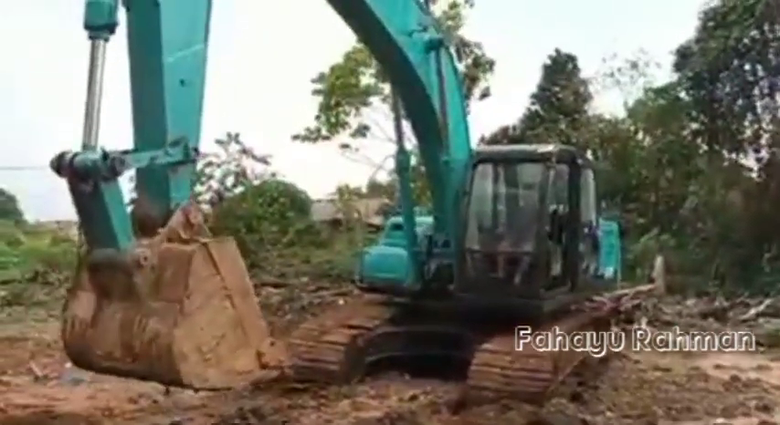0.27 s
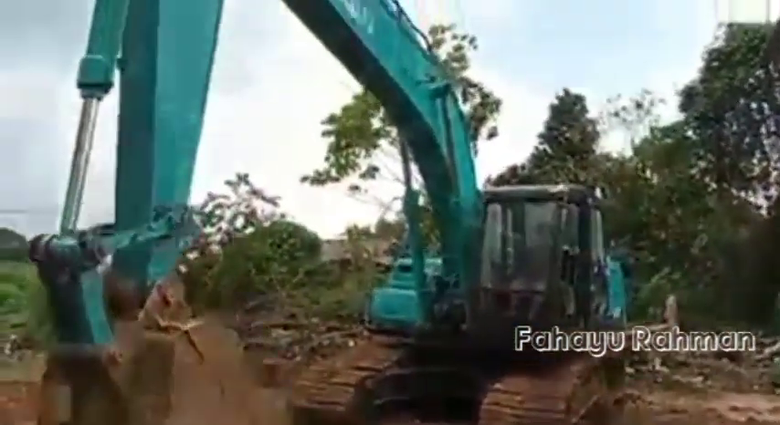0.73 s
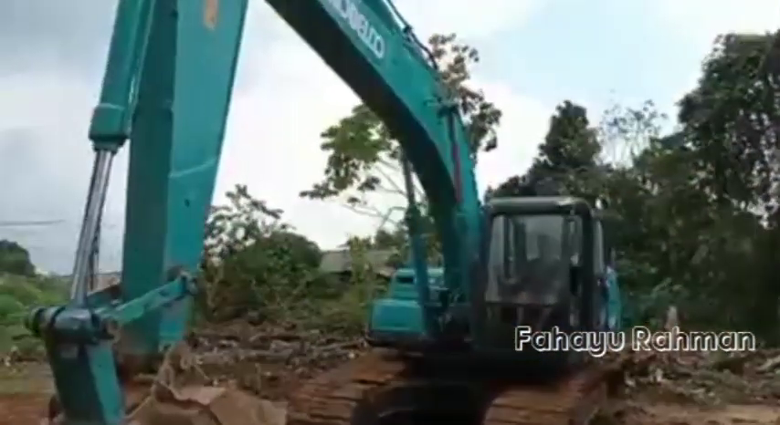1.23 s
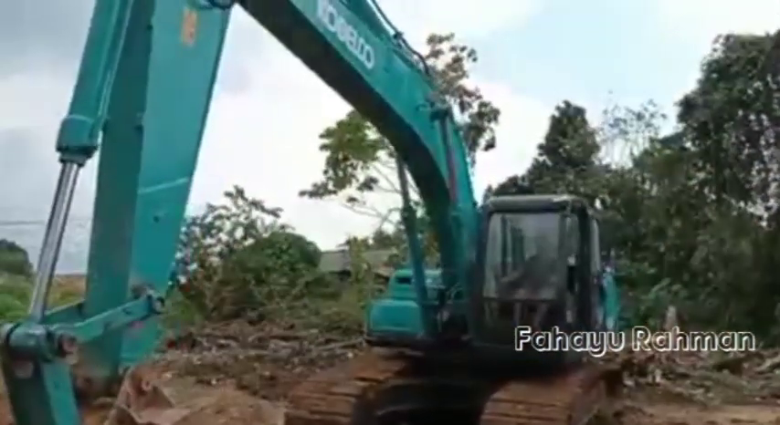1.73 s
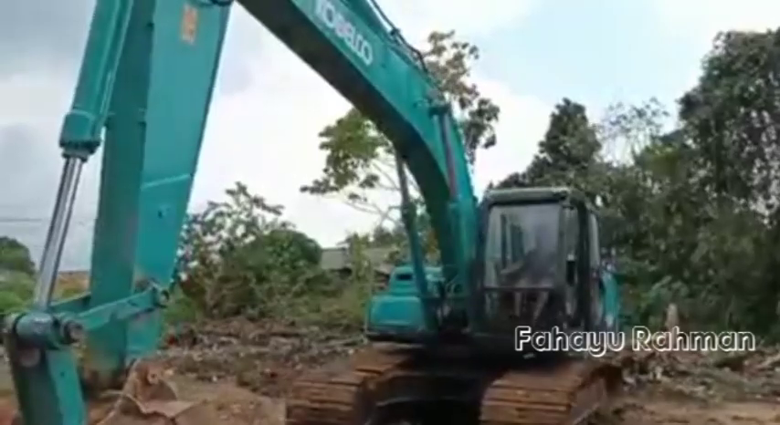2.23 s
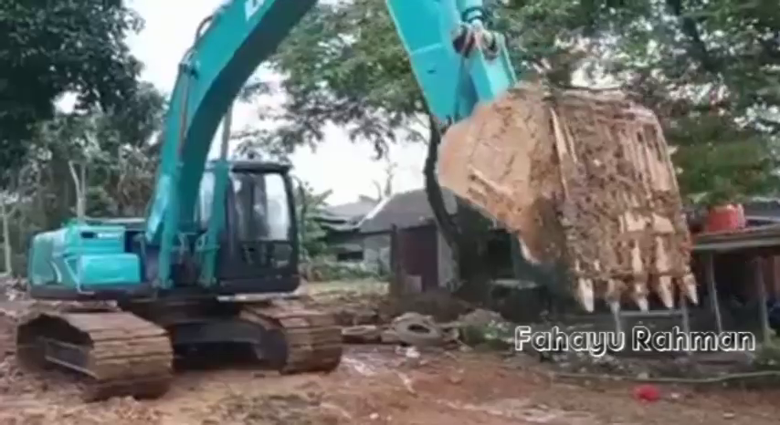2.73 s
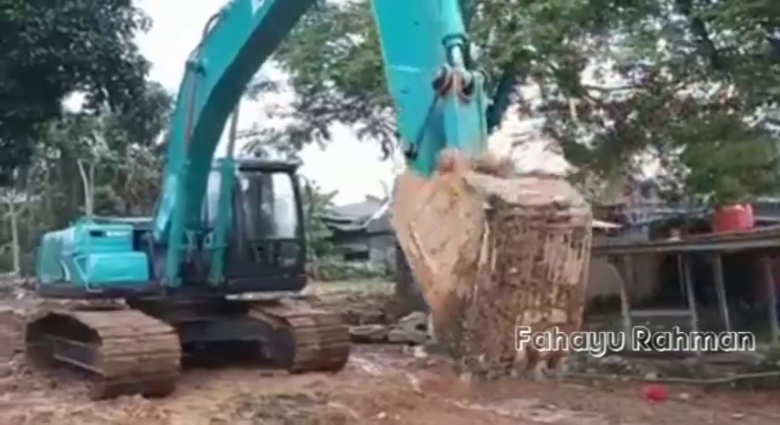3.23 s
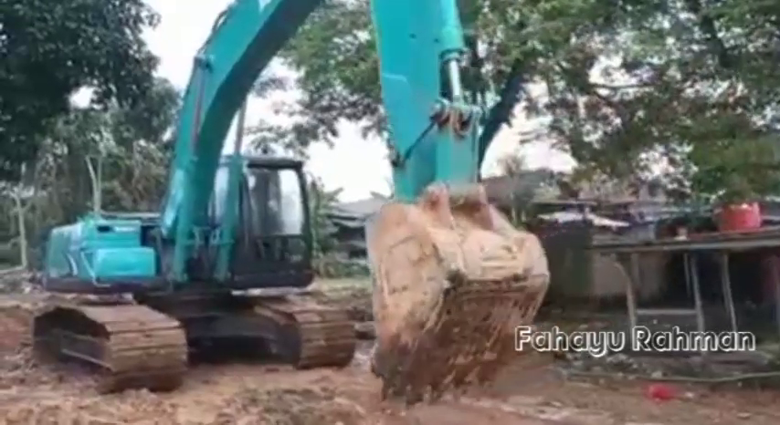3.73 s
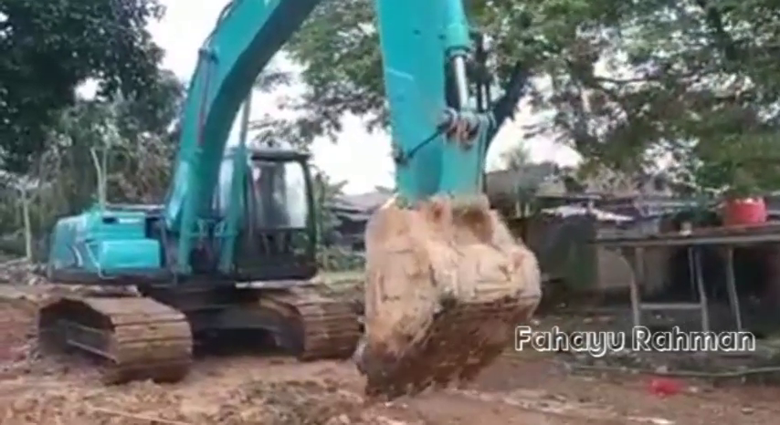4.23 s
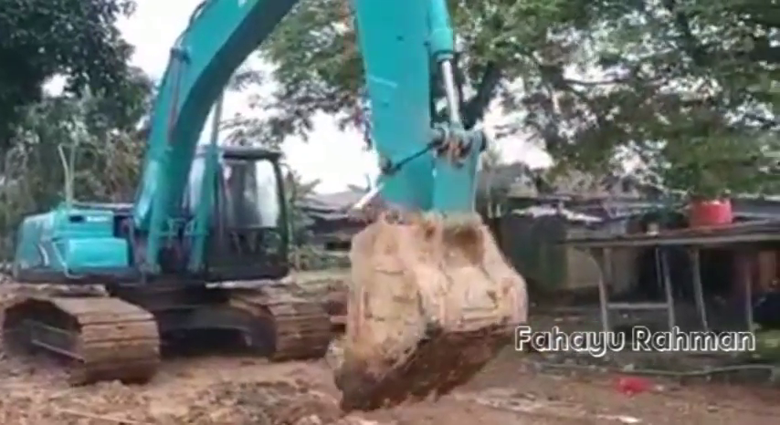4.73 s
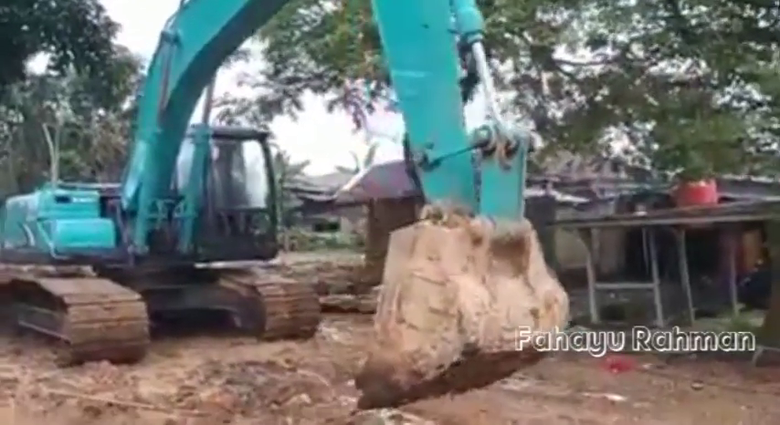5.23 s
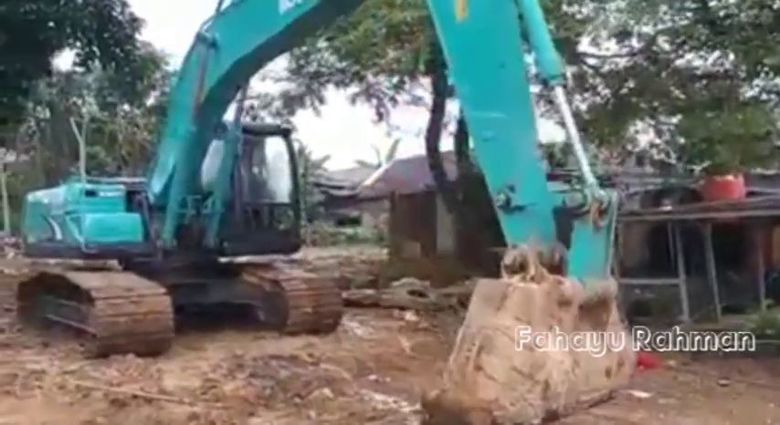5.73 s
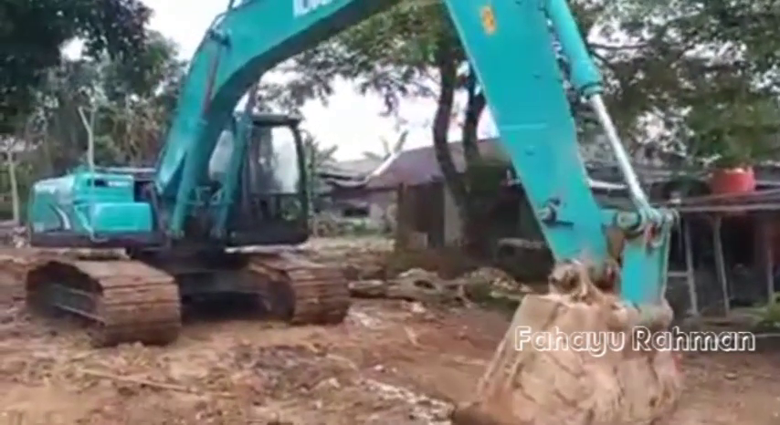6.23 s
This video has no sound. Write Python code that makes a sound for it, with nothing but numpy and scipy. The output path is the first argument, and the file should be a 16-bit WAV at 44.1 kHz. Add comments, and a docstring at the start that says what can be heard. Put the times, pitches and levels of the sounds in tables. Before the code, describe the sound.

Outdoors, a tracked excavator's diesel engine roars low and steady with a faint pump whine. Heavy steel clanks, bright pin ticks and hollow arm thuds tumble closely for under two seconds, then only engine. The sound cuts to about half a second of silence and fades back in from another position, with sparser knocks, a thin oil hiss and a last cluster of clanks. Stereo microphones fairly near, dry open air.

```python
"""Outdoors: a diesel excavator digs, heard from two positions with a silent cut and a fade-in between them.
Engine roar, exhaust orders, pump whine and fan air come from shaped noise and shaft-locked cosines.
Clanks of pins and bucket teeth are rattling noise forces ringing steel modes; the hollow boom arm
answers with low resonances, pins tick brightly. In the second position a valve hisses in a moving noise band."""
import sys
import numpy as np
from scipy import signal
from scipy.fft import rfft, irfft
from scipy.io import wavfile
from scipy.ndimage import uniform_filter1d

SR = 44100
rng = np.random.default_rng(int(sys.argv[2]) if len(sys.argv) > 2 else 0)


def output_pcm(signal):
    """Save a mono or channel-first signal as 16-bit PCM at the path in sys.argv[1].

    Samples are clipped to [-1, 1] before scaling.
    """
    pcm = np.clip(np.atleast_2d(signal).T, -1, 1) * 32767
    wavfile.write(sys.argv[1], SR, np.round(pcm).astype(np.int16))


N = 285768
T_S = np.arange(N) / SR
CUT_S, RETURN_S, FULL_S = 2.356, 2.812, 3.07  # silent from, fade-in from, fade-in to
FIRST = T_S < CUT_S  # first position

# engine roar spectrum, by position: f/Hz, relative level/dB
ROAR = [
    [(18, -59), (30, -30), (49, -10), (187, 2), (284, -15), (324, -10), (359, -2.5), (518, -20),
     (561, -7.5), (852, -15.5), (921, -18), (2420, -11.5), (3680, -30.5), (5500, -21.5), (7500, -30.5),
     (12900, -29.5), (15500, -34)],
    [(18, -60.5), (30, -49), (51, -1.5), (144, -12.5), (187, 5), (315, -33), (350, -5), (410, -20.5),
     (561, -15.5), (1770, -21), (2180, -12), (3680, -25.5), (4660, -21.5), (7860, -29.5), (15500, -37.5)],
]
# engine roar, by position: t/s, level/dB
ROAR_LEVEL = [
    [(0, -39), (.8, -37), (1.25, -37.5), (1.6, -35.5), (1.9, -39), (2.36, -40)],
    [(2.8, -38), (3.6, -39), (3.75, -36), (4.25, -38), (4.7, -34), (5.3, -37.5), (6.0, -35), (6.48, -38)],
]
# left-right/dB of the roar, by position
ROAR_PAN_DB = [1, 0]
# fan air spectrum: f/Hz, relative level/dB
FAN = [(5000, -45), (8500, 0.5), (10000, 7.0), (11500, 4), (13000, 6.5), (16000, -24.5)]
# level/dB of the fan air, by position
FAN_DB = [-58.5, -52.5]
SHAFT_HZ = 31.38  # mean turns a second
# exhaust orders, two firings a turn: multiple of shaft/1, level before wavering/dB rms
FIRING = [(2, -60.5), (4, -58), (6, -47.5), (8, -74.5)]
# whine of nine pump pistons: multiple of shaft/1, level before load and wavering/dB rms
PUMP = [(9, -52.5), (18, -51.5), (27, -58), (36, -64.5), (45, -64.5)]
# pump load, by position: t/s, gain/dB
PUMP_LOAD = [
    [(0, -5.5), (2.36, 2.5)],
    [(2.8, 0.5), (5.2, -7.5), (6.48, 5)],
]
# blows on pins and teeth: t/s, level/dB, loudest ring f/Hz, gain at 700 Hz/dB, gain at 6 kHz/dB,
# rattle/s, force t60/s
CLANKS = [(.0014, -21.5, 1360, -10.5, 0.5, 0.014, 0.21), (0.0949, -22, 2270, -7, -8.5, 0.014, 0.15),
          (0.189, -37.5, 2500, -17, 9.5, 0.022, 0.1), (0.2052, -24, 3240, -17, 8.5, 0.014, 0.038),
          (0.2257, -25, 1160, -20, -1, 0.04, 0.043), (0.2688, -36.5, 1010, -7, 2, 0.026, 0.3),
          (.43, -38.5, 1870, -4, 5.5, 0.034, 0.67), (.4687, -27, 1350, -25, -2, 0.027, 0.41),
          (0.4962, -21, 2790, -10, -2, 0.031, 0.11), (0.5287, -25.5, 1426, -17, -3.5, 0.037, 0.35),
          (0.616, -41, 1880, -24, 7.5, 0.095, 1), (.691, -16.5, 2614, -9.5, 5, 0.015, 0.36),
          (0.7192, -27, 1182, 5, 4.5, 0.045, 0.99), (0.8808, -23.5, 1830, -4, 0.5, 0.02, 0.23),
          (0.9171, -26, 1300, 4.5, -1, 0.057, .11), (.9672, -27.5, 1010, 7.5, 3, 0.041, .17),
          (1.0377, -28.5, 2620, -25, 0, 0.035, 0.035), (1.086, -27.5, 1120, -6, -43, 0.028, 0.055),
          (1.319, -25, 2870, -12.5, 8, 0.027, 0.37), (1.35, -20.5, 1440, -6.5, 3, 0.042, .38),
          (1.4056, -16.5, 2086, 1, 2.5, 0.023, 0.1), (1.4482, -26, 1330, 0.5, -8, 0.059, 0.47),
          (1.5183, -28, 1760, 2.5, 0, 0.0059, 0.37), (1.6895, -31.5, 1840, 0.5, -41, 0.014, 0.27),
          (1.711, -34.5, 1054, 13, -46, 0.03, 0.089), (3.045, -40, 1110, 3.5, -29, 0.0062, 0.5),
          (3.6311, -34, 1470, 11, 4.5, .022, .09), (3.67, -34.5, 1280, -3, -2, 0.019, 0.2),
          (3.687, -26, 1286, 7.5, -6, .021, .33), (3.959, -41.5, 1790, -3, 5, .017, 0.11),
          (4.4567, -26.5, 1103, 0.5, -44, 0.033, 0.27), (4.684, -26.5, 1790, 6, -11, 0.03, 0.12),
          (4.7285, -31, 1870, 4, -16.5, 0.022, 0.27), (4.825, -29.5, 963, -13, -5.5, 0.022, 0.4),
          (5.3574, -19, 1650, -6, -20, 0.024, 0.17), (5.384, -24.5, 1127, 3, -3, 0.034, 0.48),
          (5.4387, -29, 1160, 2.5, -10, 0.052, 0.39), (5.5263, -31.5, 1140, 3.5, -28, 0.015, 0.27),
          (5.601, -27, 2250, 2.5, -33, 0.022, 0.45), (5.7698, -22.5, 1727, 4.5, -4, 0.036, 0.28),
          (5.849, -31, 2510, 3, -1, .021, 0.43), (6.0011, -28, 1150, -0.5, -2, 0.0067, 0.27),
          (6.0744, -28, 1074, 0, -4, 0.06, 0.38), (6.113, -25, 1340, -5, -5, 0.035, 0.26),
          (6.1894, -46, 970, -7, -10.5, .016, 0.18), (6.32, -28.5, 1395, 2, -7, 0.041, 0.76),
          (6.3596, -21, 1500, -14, -2, 0.027, 0.2), (6.379, -17.5, 1050, -4.5, -6, 0.016, 0.35),
          (6.4176, -30, 1934, 6.5, -9, .07, 0.53)]
# steel of bucket and links: nominal f/Hz, nominal gain over dense ring/dB, ring/s (bandwidth 1.52/ring)
STEEL = [(392.6, 9, 0.17), (565, 8, .22), (659, 8.5, 0.057), (771.6, 11, .13), (1059, 5.5, 0.058),
         (1168, 6.5, .077), (1337, 9, 0.088), (1479, 10.5, 0.073), (1715, 0.5, 0.033), (1740.6, 11, 0.064),
         (2220, 10.5, 0.051), (2443, 9.5, 0.074), (2750, 12.5, 0.13), (3220, 3.5, .064), (3430, 10, 0.063),
         (3780, 11, 0.098), (4060, 8.5, 0.018), (4560, 10.5, 0.024), (5587, 13.5, 0.044)]
# dense ring: f/Hz, relative level/dB
DENSE_RING = [(150, -20.5), (350, 1), (900, -3), (2600, -4), (3300, -12), (6000, -16.5), (10000, -18.5),
              (15000, -52)]
# where the bucket stands, by position: t/s, treble left-right/dB
BUCKET = [
    [(0, -2), (.7, -.5), (1.0, 1.5), (1.7, 0)],
    [(3.0, -8), (3.7, -1), (4.5, -2), (4.8, 14.5), (5.4, 4.5), (5.85, 5), (6.1, -1), (6.48, 3.5)],
]
# lag/s of blows at the left, by position
LEFT_LAG_S = [0.00016, .00003]
# shudders of hollow arm (low) and bucket plates (higher): t/s, level/dB, f/Hz, shudder/s
BOOMS = [(.049, -43, 570, 0.055), (0.057, -41, 87, 0.067), (0.136, -42, 88, 0.018),
         (0.546, -31.5, 396, 0.023), (.716, -24.5, 568, 0.013), (.723, -26.5, 117, 0.11),
         (0.789, -26, 378, .05), (.8, -34.5, 127, 0.13), (.917, -33, 116, 0.086), (.959, -30, 690, 0.017),
         (1.039, -46, 535, .046), (1.078, -25.5, 209, 0.038), (1.196, -47, 86, 0.029),
         (1.356, -31, 784, .035), (1.408, -33, 113, 0.21), (1.439, -37, 670, 0.037),
         (1.524, -24.5, 125, 0.026), (1.549, -37.5, 402, 0.046), (1.727, -26, 300, 0.037),
         (1.72, -26, 219, 0.055), (1.735, -35.5, 700, 0.012), (3.04, -35, 303, 0.019),
         (3.132, -39, 192, 0.087), (3.559, -38.5, 583, 0.11), (3.575, -36, 109, 0.13),
         (3.628, -29, 589, 0.031), (3.669, -20.5, 318, 0.017), (3.679, -25.5, 137, .05),
         (3.718, -35.5, 436, 0.093), (3.73, -18.5, 112, 0.032), (3.799, -53, 117, 0.07),
         (3.799, -40.5, 370, 0.05), (3.921, -36, 123, 0.026), (3.95, -21, 106, 0.023),
         (3.965, -35, 354, 0.014), (4.048, -37.5, 190, 0.03), (4.483, -26, 110.5, 0.058),
         (4.499, -36, 747, 0.059), (4.686, -21.5, 630, 0.011), (4.695, -28, 109, 0.058),
         (4.759, -33, 122, 0.048), (4.836, -32.5, 334, 0.018), (4.855, -30, 140, 0.012),
         (5.255, -44, 128, 0.19), (5.388, -29, 376, 0.054), (5.548, -30.5, 109, 0.11),
         (5.631, -35.5, 135, 0.052), (5.64, -31, 704, 0.042), (5.785, -32, 365, 0.052),
         (5.899, -34.5, 562, 0.02), (5.905, -29.5, 108.3, 0.085), (6.0, -27, 107, 0.052),
         (6.117, -30, 795, 0.05), (6.184, -27, 558, 0.026), (6.188, -29.5, 125, 0.015),
         (6.327, -26.5, 122, 0.038), (6.351, -22, 565, 0.016), (6.399, -26, 157, 0.055),
         (6.436, -31, 401, .03)]
# bright ticks of a pin against its bush: t/s, level/dB, f/Hz
TICKS = [(0.2076, -34, 3100), (1.3197, -22.5, 2850), (1.4073, -24.5, 3700), (1.517, -36.5, 3706),
         (3.6805, -32, 4570), (6.3765, -17, 3900)]
# overtone of a shudder, weaker with pitch: pitch f/Hz, level/dB
OVERTONE = [(130, -9), (600, -20)]
# oil hissing through a valve: t/s, centre f/Hz, level/dB
VALVE = [(3.5, 4250, -58), (3.85, 4300, -43.5), (4.1, 4400, -54), (4.4, 4670, -47.5), (4.65, 5350, -45.5),
         (5.05, 5790, -44.5), (5.35, 5500, -77), (5.7, 5220, -51), (5.9, 5210, -36.5), (6.05, 5000, -49),
         (6.3, 5000, -79)]
# left-right likeness, clipped to 0..1: f/Hz, likeness/1
LIKENESS = [(60, 1), (200, 1), (400, 0.9), (800, 0.76), (1500, 0.19), (3000, 0.2), (9000, 0.3),
            (13000, 0.18)]
# microphone pair: f/Hz, left-right/dB
TILT = [(350, -0.5), (1000, -2.5), (2400, 2), (5000, 2), (9000, -1), (15000, -5.5)]
# narrow treble dip: centre f/Hz, half-width at 1/e of the dB depth/Hz, gain/dB
DIP = (7990, 300, -16)

CLANK_LEAD_S, CLANK_RISE_S, SWELL_SHARE = 0.004, 0.001, 0.13  # longer rattles swell in more softly
DETUNE = 0.03  # rms fraction by which each blow shifts each steel mode
BOOM_LEAD_S = 0.006166  # the shudder starts before its resonance is heard
BOOM_RISE_S, BOOM_T60_S, BOOM_RING_S = 0.0045, 0.21, 0.027
TICK_RISE_S, TICK_HOLD_S, TICK_T60_S, TICK_RING_S = 0.0018, 0.0034, 0.062, 0.0044
DUCK_FROM_DB, DUCK_DB_PER_DB, DUCK_RECOVERY_DB_PER_S, DUCK_ABOVE_HZ = -31.5, 0.18, 90, 5740
EDGE_HZ = 15600


def amp(db):
    """Decibels to gain."""
    return 10 ** (np.asarray(db) / 20)


def evened(x):
    """Scales to rms 1."""
    return x / np.sqrt(np.mean(abs(x) ** 2) + 1e-20)


def read(points, hz):
    """Reads a table on a log-frequency axis."""
    f, value = np.transpose(points)
    return np.interp(np.log(hz + 1), np.log(f + 1), value)


def along(tables, column):
    """Reads one column of time curves at every sample."""
    rows = np.vstack(tables)
    return np.interp(T_S, rows[:, 0], rows[:, column])


def add(mix, t_s, sound):
    """Mixes a stereo sound in at time t_s."""
    part = mix[:, round(t_s * SR):][:, :sound.shape[1]]
    part += sound[:, :part.shape[1]]


def pair(a, b, hz):
    """Two spectra become left and right, alike in the bass, unlike in the treble."""
    same = np.clip(read(LIKENESS, hz), 0, 1)
    return np.array([a, same * a + np.sqrt(1 - same ** 2) * b])


def drift(max_hz):
    """Random wander of rms 1: sixteen sines up to max_hz, slower ones stronger."""
    t = np.arange(0, N + 256, 256) / SR
    rates_hz = max_hz * np.geomspace(0.05, 1, 16)
    slow = sum(np.sin(2 * np.pi * (f * t + rng.random())) / np.sqrt(f) for f in rates_hz)
    return np.interp(T_S, t, evened(slow))


def hiss(points):
    """Stereo noise of one spectrum with drifting patches, rms 1."""
    frames, hz = N // 256 + 5, np.fft.rfftfreq(1024, 1 / SR)
    a, b, c, d, patches = rng.standard_normal((frames, 513, 5)).T
    patches = uniform_filter1d(patches, size=10, axis=0)
    patches = evened(uniform_filter1d(patches, size=12, axis=1))
    z = pair(a + 1j * b, c + 1j * d, hz[:, None])
    z = z * amp(read(points, hz)[:, None] + 2.0 * patches)
    return evened(signal.istft(z, nperseg=1024, noverlap=768)[1][:, :N])


def roar(turns):
    """Combustion noise throbbing with two firings a turn."""
    noise = np.where(FIRST, hiss(ROAR[0]), hiss(ROAR[1]))
    throb = 1 + 0.034 * np.cos(4 * np.pi * turns)
    pan_db = np.outer([0.5, -0.5], np.where(FIRST, *ROAR_PAN_DB))
    return noise * throb * amp(along(ROAR_LEVEL, 1) + pan_db)


def fan():
    """Airy treble noise of the fan, one level per position."""
    return hiss(FAN) * amp(np.where(FIRST, *FAN_DB))


def orders(table, turns, waver_db, waver_hz):
    """Cosines locked to multiples of the shaft, each wavering in level."""
    tones = 0
    for multiple, db in table:
        wave = np.cos(2 * np.pi * (multiple * turns + rng.random()))
        tones = tones + np.sqrt(2) * amp(db + waver_db * drift(waver_hz)) * wave
    return tones


def exhaust(turns):
    """Firing pulses as quickly wavering shaft orders."""
    return orders(FIRING, turns, waver_db=4.8, waver_hz=31)


def pump(turns):
    """Piston whine as shaft orders, its level set by the load."""
    return orders(PUMP, turns, waver_db=4.1, waver_hz=8) * amp(along(PUMP_LOAD, 1))


def engine():
    """One slightly uneven shaft drives roar, exhaust and pump; fan air lies over them."""
    turns = np.cumsum(SHAFT_HZ * (1 + 0.0041 * drift(2.2))) / SR
    return roar(turns) + fan() + exhaust(turns) + pump(turns)


def force(rise_s, hold_s, t60_s, lumpy_db, patchy_db, fine_db, size=16384):
    """Spectra of two rattling forces: uneven knocks that swell, hold and die, the treble first."""
    t = np.arange(size) / SR
    decay_s = max(t60_s, 0.02)
    fine = evened(uniform_filter1d(rng.standard_normal(size // 2 + 1), size=12))  # countless thin overtones
    grain = irfft(rfft(rng.standard_normal((2, size))) * amp(fine_db * fine))
    hz, at, z = signal.stft(grain, SR, nperseg=512, noverlap=256)
    rings = evened(uniform_filter1d(rng.standard_normal(z.shape[1:]), size=4, axis=1))  # narrow, lasting
    knocks = evened(uniform_filter1d(rng.standard_normal(z.shape[1:]), size=5, axis=0))  # wide, brief
    patches_db = patchy_db * (rings + knocks) / np.sqrt(2)
    loss_db_per_s = 20.0 * hz / (hz + 3000) / decay_s + 69.0 * (hz / 9000) ** 2
    z = z * amp(patches_db - np.outer(loss_db_per_s, at))
    noise = signal.istft(z, SR, nperseg=512, noverlap=256)[1]
    swell = np.clip(t / max(rise_s, 1e-3), 0, 1)
    shape = swell * amp(-60 * np.maximum(t - rise_s - max(hold_s, 0), 0) / decay_s)
    lumps = amp(lumpy_db * evened(uniform_filter1d(rng.standard_normal(size), size=90)))
    rattle = noise[:, :size] * shape * lumps
    return rfft(evened(rattle) * np.sqrt(np.mean(shape ** 2)))


def mode(hz, centre_hz, ring_s):
    """One resonance, gain 1 at its centre, half-power bandwidth 1.52 / ring_s."""
    return 1 / (1 + 2j * (hz - centre_hz) * ring_s / 1.52)


def clank(t_s, db, ring_hz, body_db, treble_db, hold_s, t60_s):
    """A rattling blow rings the steel; where it lands sets how much each mode takes."""
    rise_s = CLANK_RISE_S + SWELL_SHARE * hold_s
    z = force(rise_s, hold_s, t60_s, lumpy_db=2.5, patchy_db=3.5, fine_db=3.5)
    hz = np.fft.rfftfreq(2 * len(z[0]) - 2, 1 / SR)
    takes_db, shifts = rng.standard_normal((2, len(STEEL))) * [[3.5], [DETUNE]]
    ring = 1
    for (f, gain_db, ring_s), take_db, shift in zip(STEEL, takes_db, shifts):
        ring = ring + amp(gain_db + take_db) * mode(hz, f * (1 + shift), ring_s)
    ring = ring + amp(8) * mode(hz, ring_hz, 0.0091) + amp(10) * mode(hz, ring_hz, 0.061)
    blow = [(700, body_db), (1000, 0), (3000, 0), (6000, treble_db), (11000, 1.88 * treble_db)]
    ring = ring * amp(read(DENSE_RING, hz) + read(blow, hz))
    middle = (hz > 900) & (hz < 3500)
    ring = ring / np.sqrt(np.sum(abs(ring[middle]) ** 2) / len(hz))
    late = np.exp(-2j * np.pi * 3.955 * np.log1p(hz / 500))  # bending waves: the low part lags
    left, right = pair(*z, hz) * ring * late
    left = left * np.exp(-2j * np.pi * hz * LEFT_LAG_S[int(t_s > CUT_S)])
    pan_db = np.interp(t_s, *np.vstack(BUCKET).T)
    side = amp(pan_db / 2 * np.clip(hz / 1500, 0, 1))  # direction fades toward the bass
    return amp(db) * irfft([left * side, right / side])


def shudder(db, pitch_hz, rise_s, hold_s, t60_s, ring_s):
    """A rattling force excites a steep resonance and a weaker overtone."""
    z = force(rise_s, hold_s, t60_s, lumpy_db=-1.5, patchy_db=2.0, fine_db=0.5)
    hz = np.fft.rfftfreq(2 * len(z[0]) - 2, 1 / SR)
    overtone = amp(read(OVERTONE, pitch_hz)) * mode(hz, 1.6 * pitch_hz, ring_s) ** 2
    cavity = mode(hz, pitch_hz, ring_s) ** 2 + overtone
    cavity = cavity * hz ** 2 / (hz ** 2 + 103.0 ** 2)  # small steel parts radiate little deep bass
    return amp(db) * irfft(pair(*z, hz) * evened(cavity))


def boom(db, pitch_hz, hold_s):
    """The hollow arm or a bucket plate resonates for as long as it is shaken, then dies."""
    return shudder(db, pitch_hz, BOOM_RISE_S, hold_s, BOOM_T60_S, BOOM_RING_S)


def tick(db, pitch_hz):
    """A pin hits its bush: a short, broad, bright resonance."""
    return shudder(db, pitch_hz, TICK_RISE_S, TICK_HOLD_S, TICK_T60_S, TICK_RING_S)


def valve():
    """Oil hiss: low-passed complex noise shifted to a moving centre, second position only."""
    noise = rng.standard_normal((2, N)) + 1j * rng.standard_normal((2, N))
    band = signal.lfilter(*signal.butter(2, 170, fs=SR), noise)
    flicker_db = 2.5 * drift(40)
    turn = np.exp(2j * np.pi * np.cumsum(along([VALVE], 1)) / SR)
    return evened((band * turn).real) * amp(along([VALVE], 2) + flicker_db) * ~FIRST


def duck(x):
    """Treble gain control: falls quickly under loud sound, recovers steadily."""
    power_db = 10 * np.log10(abs(uniform_filter1d((x ** 2).mean(0), size=600)) + 1e-12)
    fall_db = np.arange(N) * DUCK_RECOVERY_DB_PER_S / SR
    held_db = np.maximum.accumulate(power_db + fall_db) - fall_db
    over_db = uniform_filter1d(np.maximum(held_db - DUCK_FROM_DB, 0), size=400)
    high = signal.butter(3, DUCK_ABOVE_HZ, "high", fs=SR, output="sos")
    treble = signal.sosfiltfilt(high, x)
    return x - treble * (1 - amp(-DUCK_DB_PER_DB * over_db))


def scene():
    """All sources together."""
    mix = engine() + valve()
    for row in CLANKS:
        add(mix, max(row[0] - CLANK_LEAD_S, 0), clank(*row)[:, :-1024])  # force leads the audible ring
    for t_s, db, hz, hold_s in BOOMS:
        add(mix, t_s - BOOM_LEAD_S, boom(db, hz, hold_s))
    for t_s, db, hz in TICKS:
        add(mix, t_s, tick(db, hz))
    return mix


def record(dry):
    """Treble gain control, bass roll-off, soft limiting, cut and fade-in, microphone balance, band limit."""
    before = np.clip((CUT_S - T_S) / 0.0057, 0, 1)
    after = np.clip((T_S - RETURN_S) / (FULL_S - RETURN_S), 0, 1)
    thinned = signal.sosfilt(signal.butter(2, 45.0, "high", fs=SR, output="sos"), duck(dry))
    rounded = 0.9 * np.tanh(thinned / 0.9)  # the input stage rounds off the loudest peaks
    hz = np.linspace(0, SR / 2, 1025)
    dip_db = DIP[2] * np.exp(-((hz - DIP[0]) / DIP[1]) ** 2)
    tilt_db = read(TILT, hz) / 2
    colour = [signal.firwin2(1023, hz, amp(dip_db + side * tilt_db), fs=SR) for side in (1, -1)]
    coloured = signal.oaconvolve(rounded * (before + after), colour, "same", axes=1)
    edge = signal.firwin(511, EDGE_HZ, window=("kaiser", 9), fs=SR)
    return signal.oaconvolve(coloured, edge[None], "same")


dry = scene()
out = record(dry)
output_pcm(out)
```